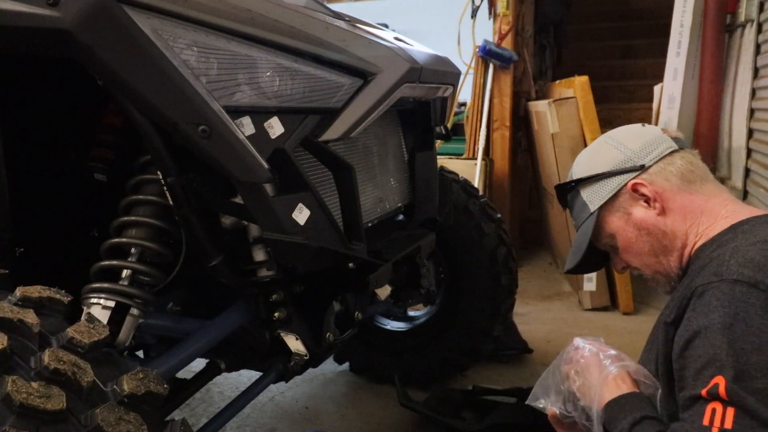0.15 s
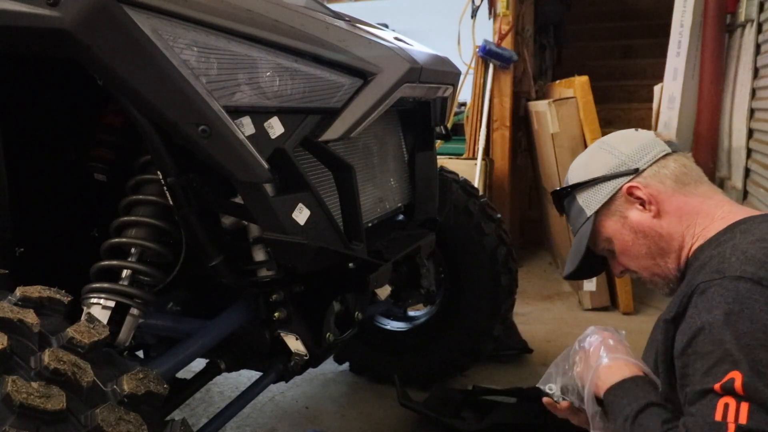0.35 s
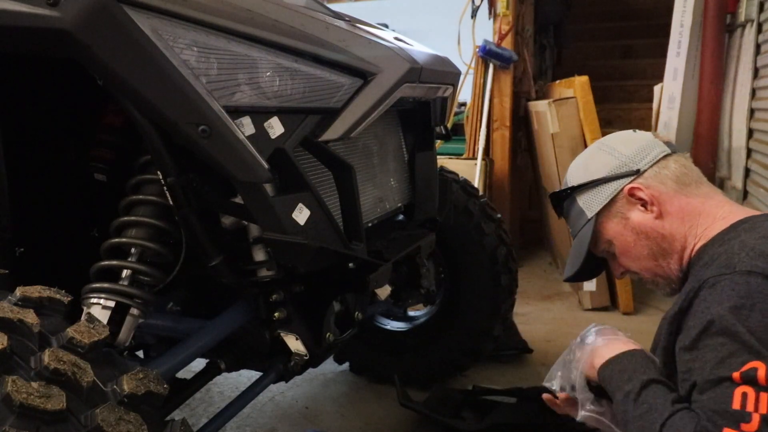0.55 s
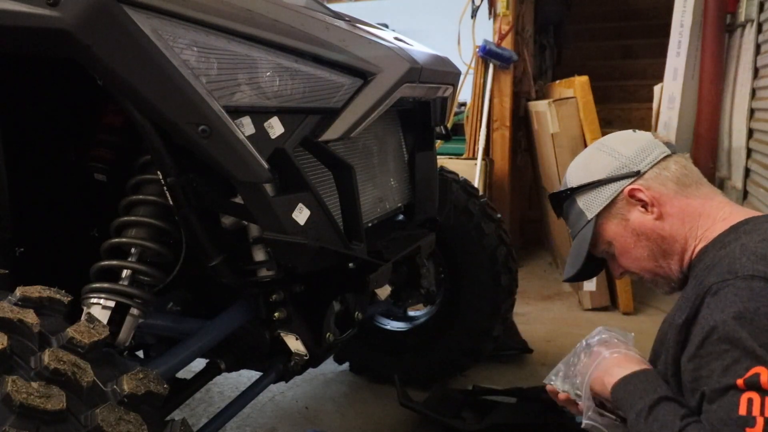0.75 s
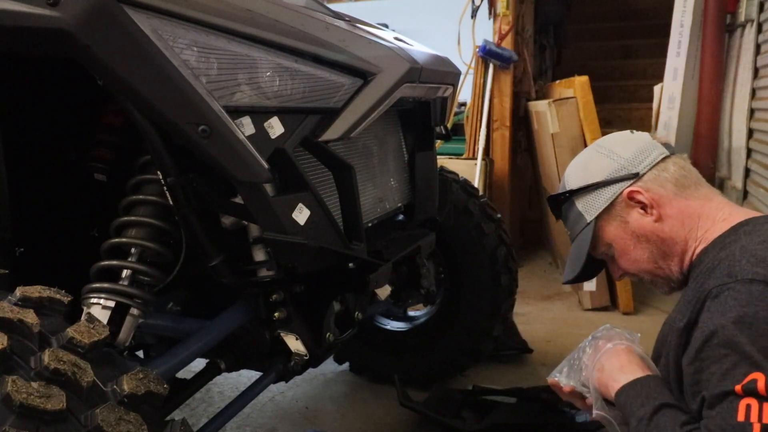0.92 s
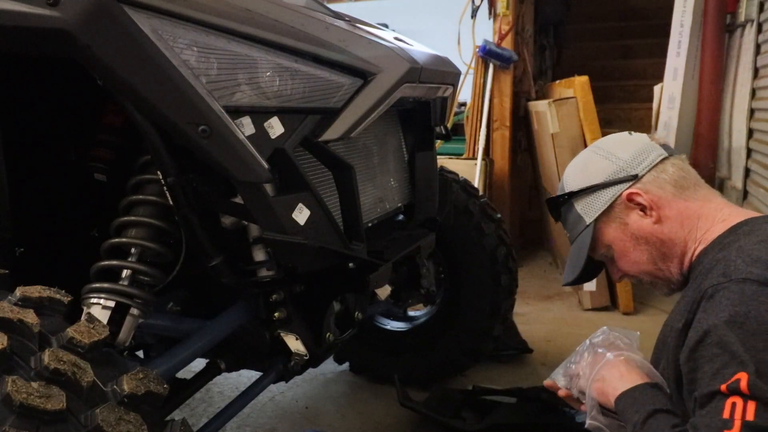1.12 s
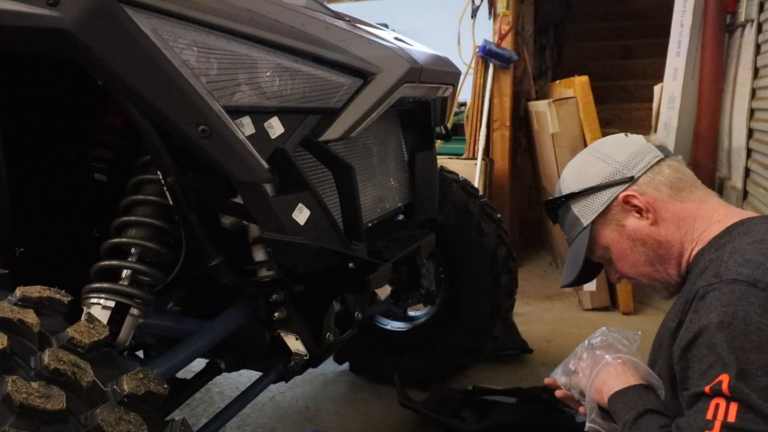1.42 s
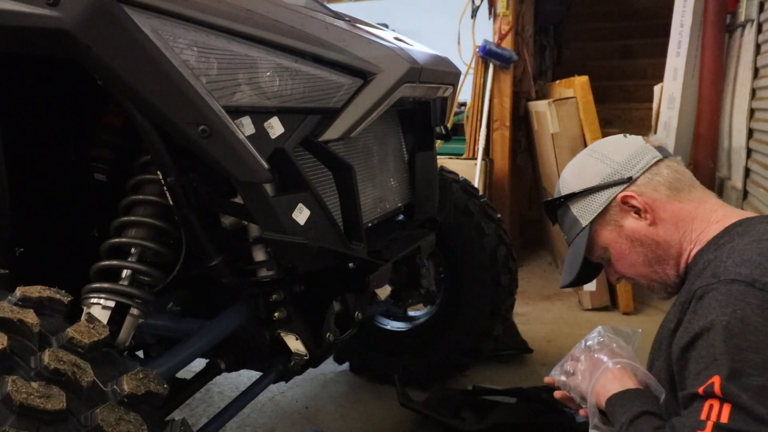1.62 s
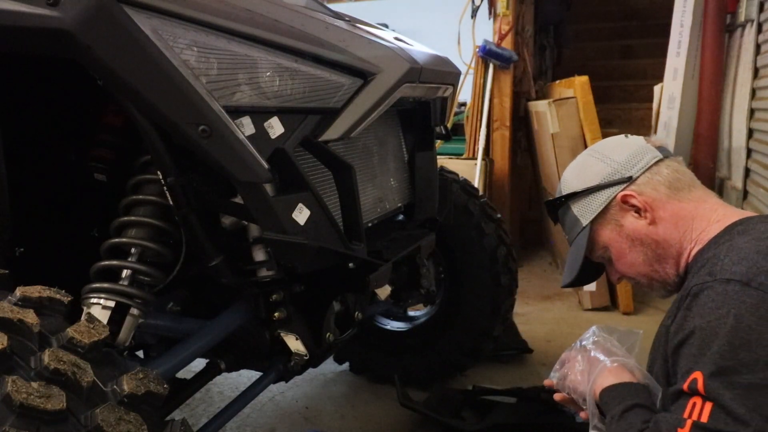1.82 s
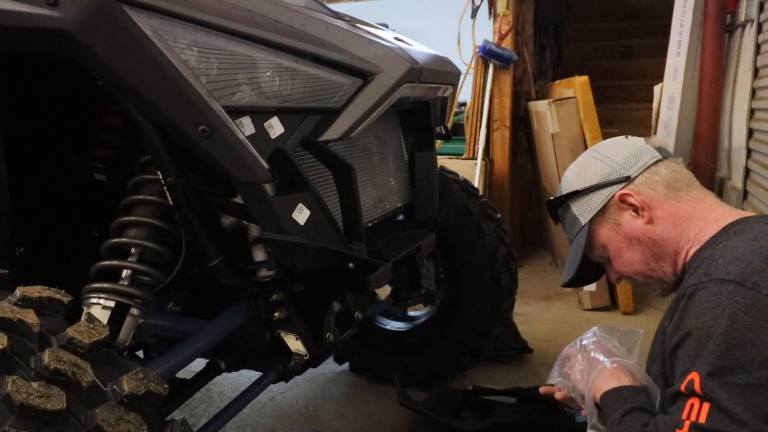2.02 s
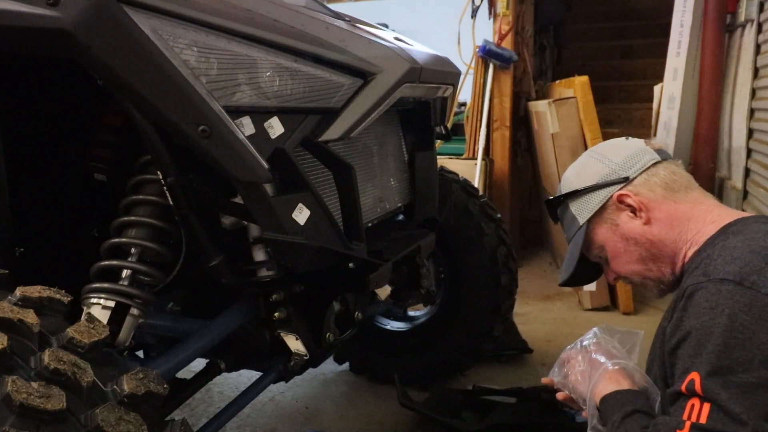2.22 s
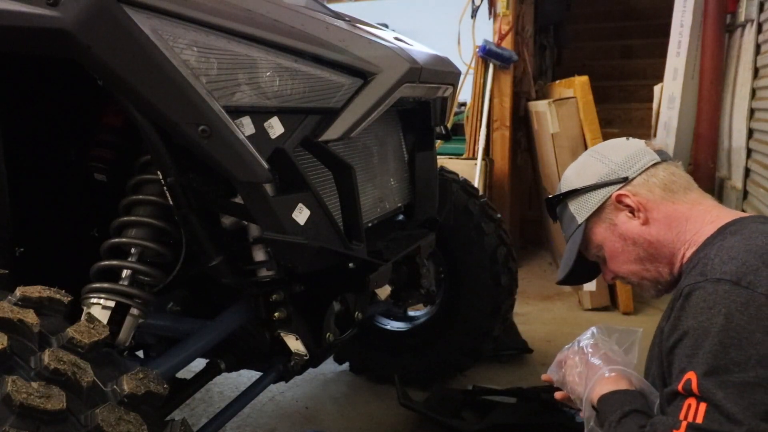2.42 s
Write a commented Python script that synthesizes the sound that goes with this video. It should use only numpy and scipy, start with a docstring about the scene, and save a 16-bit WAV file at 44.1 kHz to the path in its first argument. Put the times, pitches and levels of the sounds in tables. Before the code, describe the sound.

Bolts clinking and jingling in a crackling plastic bag, handled close by in a workshop.

```python
"""Metal bolts clink in a crackling plastic bag, sorted by hand in a workshop, close to the right of a
small stereo microphone. Long and short bolts ring until they fade or a finger grips them; nuts and
washers tick high above. Folds of the bag snap and its tiny creases crinkle. Nearby surfaces and
a short room tail throw the sound back, and the building hums faintly underneath."""
import sys
import numpy as np
from scipy import signal
from scipy.fft import rfft, irfft, next_fast_len
from scipy.io import wavfile
from scipy.ndimage import uniform_filter1d

SR = 44100
rng = np.random.default_rng(int(sys.argv[2]) if len(sys.argv) > 2 else 0)


def wav_record(signal):
    """Record a signal, one row per channel, as 16-bit PCM in the file named by sys.argv[1]."""
    frames = np.transpose(np.atleast_2d(signal))
    bounded = np.clip(frames, -1, 1)
    # unit amplitude maps onto the largest positive 16-bit level
    quanta = np.round(bounded * 32767).astype(np.int16)
    wavfile.write(sys.argv[1], SR, quanta)


N = 112454

# The modes of a long and of a short bolt in Hz; the second of each is its main mode.
LONG_MODES_HZ = [1810, 4560, 4585, 8385, 12200]
SHORT_MODES_HZ = [2915, 5850, 5878, 9540, 10050, 14290]


def long_bolts():
    """Long bolts knock together and ring near 4.6 kHz."""
    # Each row: start in seconds, level in dB, main pitch in Hz, base t60 in seconds, side modes in dB.
    hits = [(.001, -21.5, 4565, 0.4, -4), (.116, -29, 4560, 0.71, -4), (.207, -21, 4560, 0.058, -11),
            (.2468, -12, 4560, .9, -14), (.343, -32, 4530, 0.33, 3), (.38, -30, 4574, 1, -1.5),
            (.408, -30, 4460, 0.25, -18), (.488, -28, 4610, 0.15, -14), (.596, -30.5, 4640, 0.13, -9),
            (.657, -30, 4530, 0.22, 11.5), (.704, -20, 4625, 0.25, 2), (.716, -24.5, 4518, 0.12, 14),
            (.726, -18.5, 4450, 0.046, -17), (.787, -33, 4600, 0.34, 8), (1.436, -30, 4460, 0.043, -14),
            (1.499, -34.5, 4380, 0.14, 1), (2.055, -23, 4540, 0.21, 0), (2.092, -35, 4540, 0.97, -16),
            (2.148, -46, 4470, 0.43, 0), (2.421, -48, 4660, 0.17, 2)]
    # Each row: gain of one mode in dB, its t60 as a share of the base t60.
    modes = [(-5.5, 0.17), (3.5, 0.37), (-54, 0.19), (-4, 0.3), (-21, 1)]
    # Times in seconds at which a finger lands on the bolt.
    grips = [.085, .303, .495, .69, 1.62, 2.078, 2.128, 2.24]
    return clinks(hits, LONG_MODES_HZ, modes, grips)


def short_bolts():
    """Short bolts ring higher, with two close modes beating near 5.9 kHz."""
    # Each row: start in seconds, level in dB, main pitch in Hz, base t60 in seconds, side modes in dB.
    hits = [(.001, -31.5, 5830, 0.1, -16), (.2472, -24.5, 5840, 0.9, 7.5), (.374, -33.5, 5800, 0.29, -6),
            (.408, -32, 5855, 0.57, -1.5), (.660, -30, 5920, 0.2, -8), (.706, -26, 5920, 0.15, -2),
            (.712, -40, 5970, 0.32, 15.5), (.726, -16.5, 5860, 0.056, -4), (.75, -35, 5800, 0.4, -25),
            (.772, -36, 5820, 0.69, -3), (.80, -42, 5820, 0.6, 9)]
    # Each row: gain of one mode in dB, its t60 as a share of the base t60.
    modes = [(-6.5, 0.17), (6, 0.45), (8, 0.5), (6, 0.11), (-11, 0.11), (-19.5, 0.62)]
    # Times in seconds at which a finger lands on the bolt.
    grips = [.495, .69, 1.01]
    return clinks(hits, SHORT_MODES_HZ, modes, grips)


def clinks(hits, modes_hz, modes, grips):
    """Each blow clacks at first contact and rings a bolt's modes; the next grip damps them."""
    clack_hz, clack_db, clack_t60 = 3700, 5, .009
    grip_t60, attack_s = .14, .000067
    out, t = np.zeros(N), np.arange(SR // 2) / SR
    for (start, db, pitch_hz, base_t60, side_db), phase in zip(hits, rng.random(len(hits))):
        ring = amp(clack_db - 60 * t / clack_t60) * np.sin(2 * np.pi * clack_hz * t)
        for k, (hz, (mode_db, share)) in enumerate(zip(modes_hz, modes)):
            is_side = k not in (1, 2)  # all but the main mode and its close twin
            envelope = amp(mode_db + side_db * is_side - 60 * t / max(base_t60 * share, .005))
            cycles = hz * pitch_hz / modes_hz[1] * t + phase * (k == 2)
            ring += envelope * np.sin(2 * np.pi * cycles)
        next_grip = min([grip for grip in grips if grip > start] + [N / SR])
        held_s = np.maximum(t + start - next_grip, 0)
        add(out, start, amp(db - 60 * held_s / grip_t60) * np.minimum(t / attack_s, 1) * ring)
    # The ring flutters as a bolt turns and brushes others.
    flutter_db, width = .8, round(.012 * SR)
    flutter = uniform_filter1d(uniform_filter1d(rng.standard_normal(N), width), width)
    return out * amp(flutter_db * unit_rms(flutter))


def nut_ticks():
    """Nuts and washers ring with a high, short cluster of tones."""
    # Each row: start in seconds, level in dB, pitch in Hz.
    ticks = [(0.0294, -34, 12400), (0.6584, -29, 15000), (0.7083, -16, 15200), (0.7277, -13.5, 12200),
             (0.7587, -40, 14800), (0.7664, -39, 15000), (0.7776, -22, 14600), (0.8014, -13, 14900),
             (0.8344, -30, 14900), (1.4207, -39, 13400), (1.476, -31.5, 13400), (1.5145, -36, 13500),
             (1.5344, -35, 12500), (1.5643, -32, 14500), (1.5903, -31, 13400)]
    # Each row: offset of one tone from the pitch in Hz, its gain in dB.
    cluster = [(-29, 0.5), (172, -16), (-260, -19)]
    t60, attack_s = .025, .0019
    out, t = np.zeros(N), np.arange(SR // 4) / SR
    for start, db, hz in ticks:
        ring = sum(amp(tone_db) * np.sin(2 * np.pi * (hz + offset) * t) for offset, tone_db in cluster)
        add(out, start, amp(db - 60 * t / t60) * np.minimum(t / attack_s, 1) * ring)
    return out


def jingle():
    """Loose parts tumble: each light knock briefly rings one bolt mode or one small part."""
    # Each row: start and end of a tumble in seconds, level in dB.
    tumbles = [(0.03, 0.164, -42), (0.64, 0.674, -47), (0.704, 0.821, -29.5), (.83, 0.97, -61),
               (1.408, 1.606, -46.5)]
    # Pitches of the small parts in Hz.
    small_parts_hz = [12200, 12500, 13400, 14100, 14500, 14900, 15200]
    t60, detune = .021, .0011
    out, clock, t = np.zeros(N), np.arange(N) / SR, np.arange(3000) / SR
    tones = LONG_MODES_HZ + SHORT_MODES_HZ + small_parts_hz
    knocks = impulses(per_s=460, spread_db=.95)
    knocks *= sum(amp(db) * (clock > start) * (clock < end) for start, end, db in tumbles)
    struck = rng.integers(0, len(tones), N)
    tuning = 1 + detune * rng.uniform(-1, 1, len(tones))
    for k, hz in enumerate(tones):
        ring = amp(-60 * t / t60) * np.sin(2 * np.pi * hz * tuning[k] * t)
        out += signal.oaconvolve(knocks * (struck == k), ring)[:N]
    return out


def bag_snaps():
    """A fold of film flips, or the main bolt blow cracks: a crack, then a shiver round its pitch over a wide
    body; treble dies first."""
    # Each row: start in seconds, level in dB, pitch of the fold in Hz, extra treble in dB. The row at 0.2468 s
    # is the crack of the main bolt blow.
    snaps = [(0.003, -20, 2900, -11), (0.015, -24, 1820, 1), (0.093, -23, 1060, -19),
             (0.103, -16, 1720, -16), (0.115, -14, 1660, -22), (0.142, -12, 810, -6),
             (0.154, -12.5, 805, -5.5), (0.186, -16, 3820, 1), (0.207, -18.5, 730, -3),
             (0.2468, -17, 3640, 3), (0.329, -17, 1500, -13), (0.407, -25.5, 1850, -28),
             (0.453, -42, 1010, 11), (0.478, -23.5, 1910, -18), (0.488, -22, 2600, -25),
             (0.502, -17.5, 1650, -9), (0.573, -28, 720, -4), (0.596, -28, 930, -9),
             (0.639, -23.5, 840, -28), (0.654, -11, 1050, -30), (0.677, -19, 730, -30),
             (0.686, -20.5, 1840, -23), (0.702, -19, 2100, -18), (0.715, -23, 3060, -19),
             (0.726, -20, 3240, -6), (0.797, -16.5, 1700, -17), (0.906, -27, 1670, -24),
             (0.972, -17, 1460, -12), (0.983, -20.5, 1460, -36), (1.031, -26.5, 970, -8),
             (1.05, -21, 880, -13), (1.076, -22, 1870, -19), (1.106, -26, 2280, -18),
             (1.123, -20, 3470, -2.5), (1.21, -30.5, 1500, -36), (1.307, -26.5, 785, 2.5),
             (1.353, -26.5, 750, -30), (1.405, -47, 720, 12), (1.436, -29.5, 2960, -1),
             (1.477, -35.5, 2970, -3), (1.526, -32.5, 715, -9), (1.631, -20.5, 2150, -6),
             (1.668, -19, 1580, -8), (1.695, -16, 1200, -0.5), (1.765, -16.5, 2420, -39),
             (1.782, -20, 3840, -31), (1.79, -16.5, 2800, -30), (1.8, -22, 710, -29), (1.85, -32, 1300, 1),
             (1.858, -25, 1880, -5), (1.879, -22, 1040, -22), (1.893, -12.5, 1800, -2.5),
             (2.013, -40.5, 736, 12), (2.024, -25.5, 1050, -12), (2.041, -32, 1210, -6),
             (2.104, -47, 1880, 21.5), (2.123, -26.5, 690, -23), (2.134, -25.5, 660, -36),
             (2.208, -34.5, 900, -18), (2.279, -38, 710, -27), (2.311, -38.5, 2680, -27),
             (2.4404, -23, 2300, -28), (2.45, -32, 790, -25), (2.459, -20.5, 2200, -14),
             (2.508, -33.5, 660, -7), (2.532, -35, 999, -30)]
    # The body band, then the treble band. Each row: lower and upper edge in Hz.
    wide_bands = [(250, 5200), (7000, 14700)]
    # Gains in dB, then t60s in seconds, each in the order fold, body, treble.
    band_db = [-9, -6, -7.5]
    band_t60 = [.034, .026, .012]
    # Resonances of the hollow of bag and hands. Each row: pitch in Hz, width in Hz, boost in dB.
    hollow = [(711, 23, 7), (1050, 18, 5.5)]
    crack_db, crack_s, rise_s, fold_ratio = -3, .00032, .0007, 1.364
    out, t = np.zeros(N), np.arange(SR // 8) / SR
    crack = amp(crack_db) * np.exp(-t / crack_s)
    envelopes = [crack + amp(-60 * t / t60) * np.minimum(t / rise_s, 1) for t60 in band_t60]
    for start, db, hz, treble_db in snaps:
        bands = [(hz / fold_ratio, hz * fold_ratio)] + wide_bands
        bursts = []
        for band, envelope in zip(bands, envelopes):
            bandpass = signal.butter(2, band, "band", fs=SR, output="sos")
            burst = signal.sosfilt(bandpass, rng.standard_normal(len(t)) * envelope)
            bursts.append(unit_rms(burst) * np.sqrt(np.mean(envelope ** 2)))
        add(out, start, amp(db + np.add(band_db, [0, 0, treble_db])) @ bursts)
    for hz, width, db in hollow:
        out += (amp(db) - 1) * signal.lfilter(*signal.iirpeak(hz, hz / width, SR), out)
    return out


def bag_crinkle():
    """Many tiny creases, each a short noisy ping, swell and fade with the work of the hands."""
    # Each row: time in seconds, crinkle level in dB, treble share in dB.
    handling = [(0.0, -34.5, -5), (0.29, -40.5, 9), (0.61, -38, -1.5), (0.78, -40, 15.5),
                (0.93, -48.5, 6.5), (1.12, -45, -24), (1.2, -51.5, -4), (1.51, -49, 4), (1.82, -42, -21),
                (2.08, -49.5, 12), (2.24, -55, -39), (2.55, -56.5, -17)]
    # The colour of the film. Each row: frequency in Hz, gain in dB.
    film_colour = [(59, -18), (100, -4.5), (308, -6), (570, -7), (721, -5.5), (1450, -7.5), (1830, -5),
                   (2580, -8), (4670, -13), (16000, -43.5)]
    t60, pitch_count, resting_treble_db = .034, 24, -7.5
    pings, clock, t = np.zeros(N), np.arange(N) / SR, np.arange(1500) / SR
    creases = impulses(per_s=1500, spread_db=5.5)
    pitch_index = rng.integers(0, pitch_count, N)
    for k, hz in enumerate(np.geomspace(300, 14000, pitch_count)):
        burst = rng.standard_normal(len(t)) * amp(-60 * t / t60)
        ping = coloured(burst, lambda f: .4 + np.exp(-(np.log((f + 1) / hz) / .44) ** 2))
        pings += signal.oaconvolve(creases * (pitch_index == k), ping)[:N]
    film = unit_rms(coloured(pings, lambda f: amp(curve_at(film_colour, f))))
    treble = coloured(film, lambda f: 1 / (1 + (5500 / (f + 1)) ** 6))
    times, db, treble_db = np.transpose(handling)
    treble_gain = amp(np.interp(clock, times, treble_db) - resting_treble_db)
    return amp(np.interp(clock, times, db)) * (film - treble + treble * treble_gain)


def close_echoes(x):
    """Close surfaces throw the bag's sound back; the pattern shifts as hands and bag move."""
    level_db, shifts_per_s = -4, 1.7
    turn = 2 * np.pi * shifts_per_s * np.arange(N) / SR
    fades = [np.cos(turn + k * np.pi / 4) / np.sqrt(2) for k in range(4)]
    return amp(level_db) * sum(room(x * fade, t60_scale=.05) for fade in fades)


def room(x, t60_scale=1):
    """The workshop answers in stereo: sparse echoes of random sign, each band dying at its own speed."""
    # Each row: frequency in Hz, t60 of the room in seconds.
    decay = [(250, 0.59), (660, 0.32), (1740, 0.21), (4590, 0.3), (12100, 0.15)]
    taps, spacing = np.zeros((2, SR // 2)), 20
    slots = np.arange(2 * spacing, SR // 2 - spacing, spacing)
    arrivals = slots + rng.integers(0, spacing, (2, len(slots)))
    np.put_along_axis(taps, arrivals, rng.choice([-1., 1.], arrivals.shape), 1)
    hz, t, spectrum = signal.stft(taps, SR, nperseg=256)
    t60 = t60_scale * curve_at(decay, hz)[:, None]
    tail = signal.istft(spectrum * amp(-60 * t / t60), SR, nperseg=256)[1]
    return signal.fftconvolve(x[None], tail / np.linalg.norm(tail[0]), axes=1)[:, :N]


def building_hum():
    """Steady low noise of the building and faint hiss, alike left and right only in the bass."""
    # Each row: frequency in Hz, relative level in dB.
    colour = [(12, -25), (20, -18), (60, 11), (210, -4), (285, -7), (590, -6), (2670, -22), (8650, -16),
              (14700, -33), (16000, -50)]
    # Each row: frequency in Hz, left-right likeness from 0 to 1.
    likeness = [(30, 1), (300, 0.59), (1000, 0.13), (3000, 0.067)]
    level_db = -50
    left, independent = rng.standard_normal((2, N))
    right = coloured(left, lambda f: curve_at(likeness, f))
    right += coloured(independent, lambda f: np.sqrt(1 - curve_at(likeness, f) ** 2))
    return amp(level_db) * unit_rms(coloured(np.array([left, right]), lambda f: amp(curve_at(colour, f))))


def impulses(per_s, spread_db):
    """Randomly timed impulses, most weak and a few strong."""
    return amp(spread_db * np.minimum(rng.exponential(1, N), 4)) * (rng.random(N) < per_s / SR)


def amp(db):
    return 10 ** (np.asarray(db) / 20)


def unit_rms(x):
    return x / np.sqrt(np.mean(x ** 2) + 1e-20)


def curve_at(points, hz):
    """Interpolates rows of frequency and value on a log frequency axis."""
    f, value = np.transpose(points)
    return np.interp(np.log(hz + 1), np.log(f + 1), value)


def add(mix, start_s, sound):
    part = mix[max(round(start_s * SR), 0):][:len(sound)]
    part += sound[:len(part)]


def coloured(x, gain):
    """Filters by a gain given as a function of frequency."""
    size = next_fast_len(x.shape[-1] + 2048)
    return irfft(rfft(x, size) * gain(np.fft.rfftfreq(size, 1 / SR)), size)[..., :x.shape[-1]]


def scene():
    """The bag's sound reaches the microphone's right port first; the left lies in the housing's shadow."""
    # Each row: frequency in Hz, level of the left port against the right in dB.
    shadow = [(100, 2), (1000, 2), (2500, -1.5), (4600, -1.5), (7500, -6), (12500, -10)]
    left_lag_s = .000068
    bag_send_db, metal_send_db = -4, -6.5  # the bolts face the microphone and excite the room less
    metal = long_bolts() + short_bolts() + nut_ticks() + jingle()
    bag = bag_snaps() + bag_crinkle()
    echoes = room(amp(bag_send_db) * bag + amp(metal_send_db) * metal) + close_echoes(bag)
    # The bass of the room is alike in both ports.
    echoes += coloured(echoes.mean(0) - echoes, lambda f: 1 / (1 + (f / 600) ** 3))
    direct = metal + bag
    left = coloured(direct, lambda f: amp(curve_at(shadow, f) / 2) * np.exp(-2j * np.pi * f * left_lag_s))
    right = coloured(direct, lambda f: amp(-curve_at(shadow, f) / 2))
    return np.array([left, right]) + echoes + building_hum()


def record(dry):
    """The recorder clips at full scale, then cuts the highest treble."""
    cutoff_hz = 16300
    lowpass = signal.firwin(511, cutoff_hz, window=("kaiser", 9), fs=SR)
    return signal.oaconvolve(np.clip(dry, -1, 1), lowpass[None], "same")


dry = scene()
out = record(dry)
wav_record(out)
```